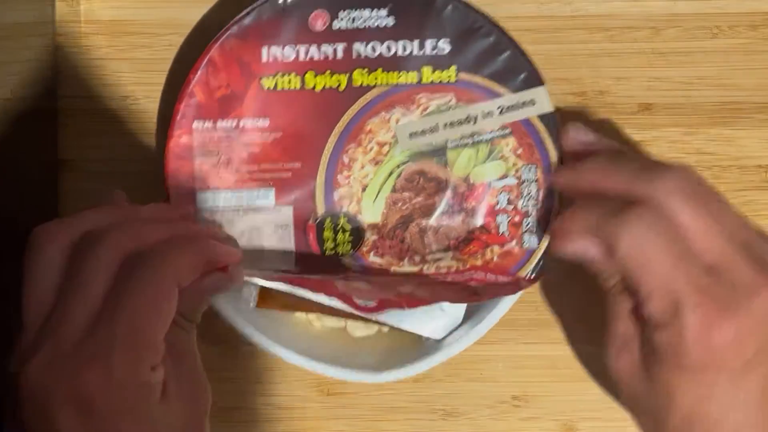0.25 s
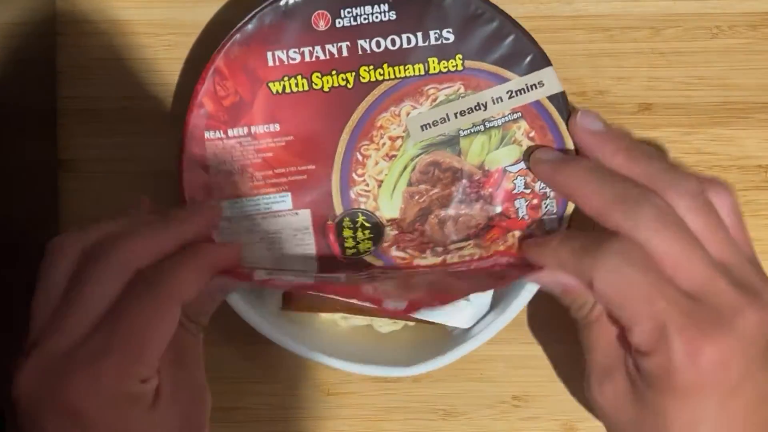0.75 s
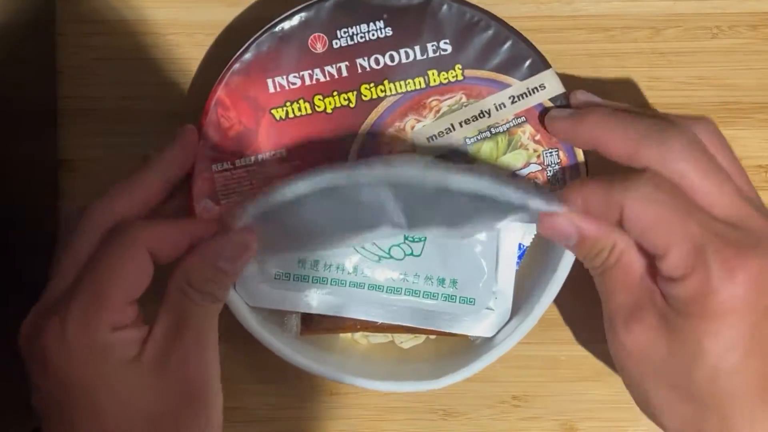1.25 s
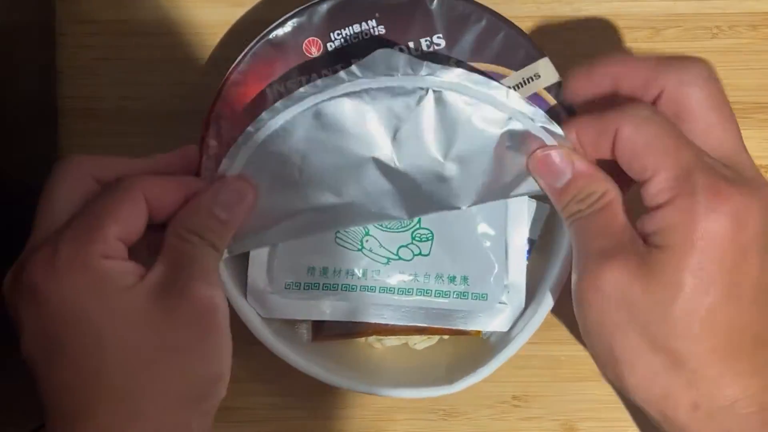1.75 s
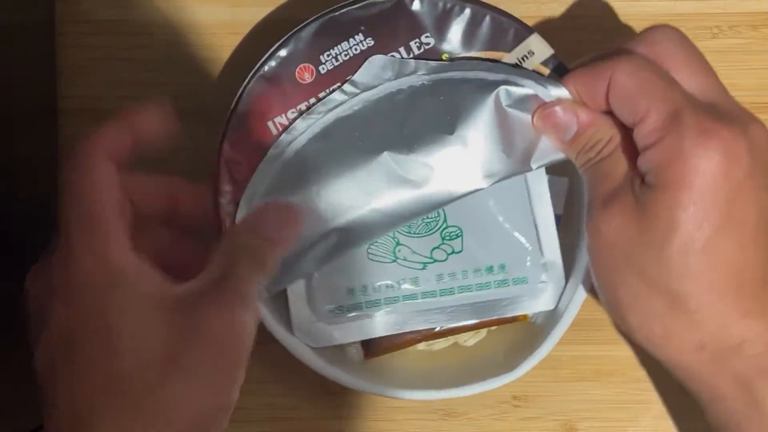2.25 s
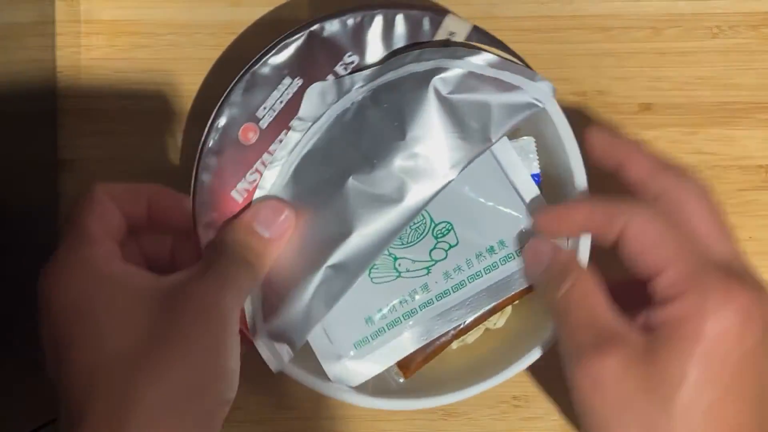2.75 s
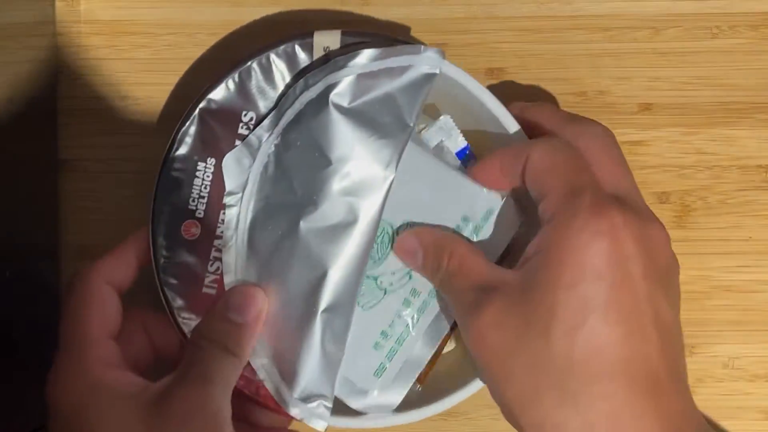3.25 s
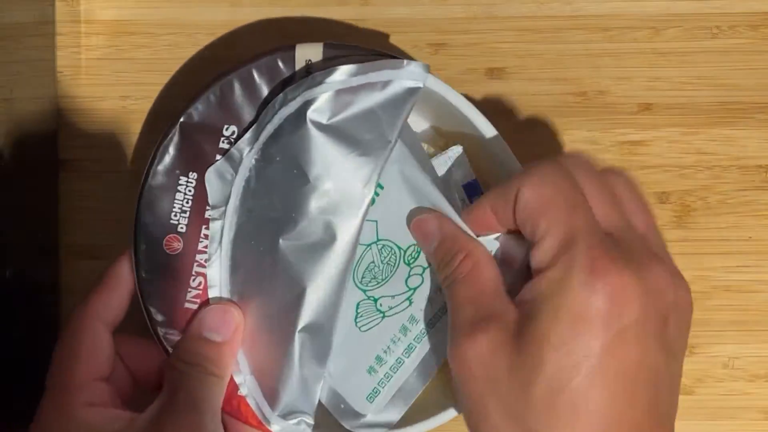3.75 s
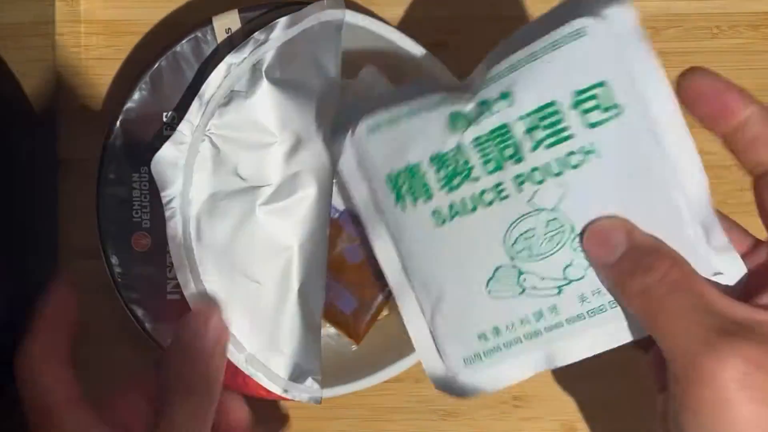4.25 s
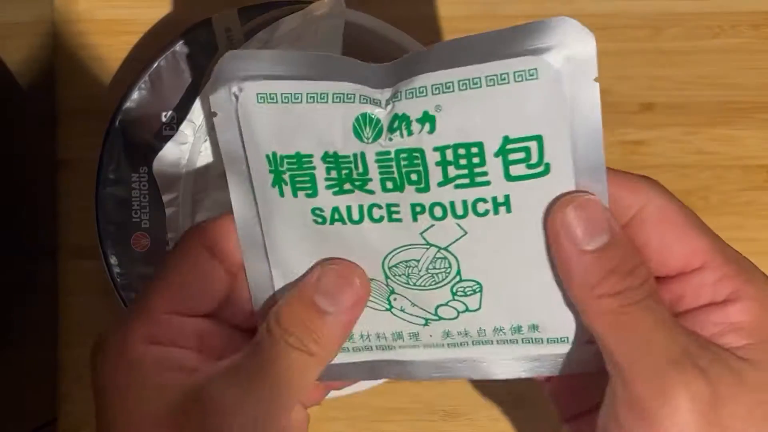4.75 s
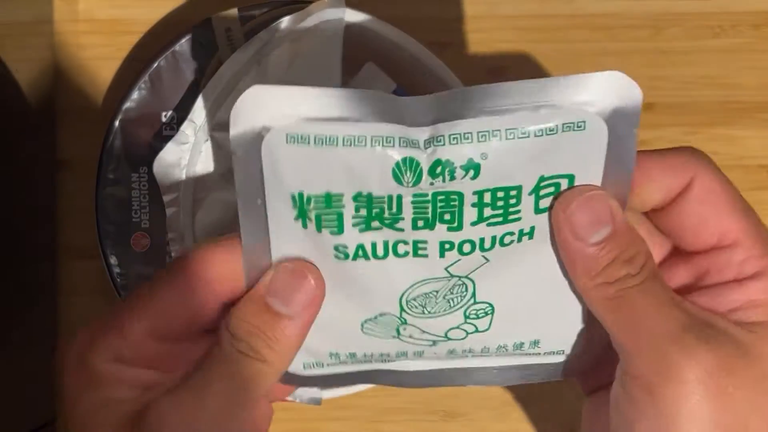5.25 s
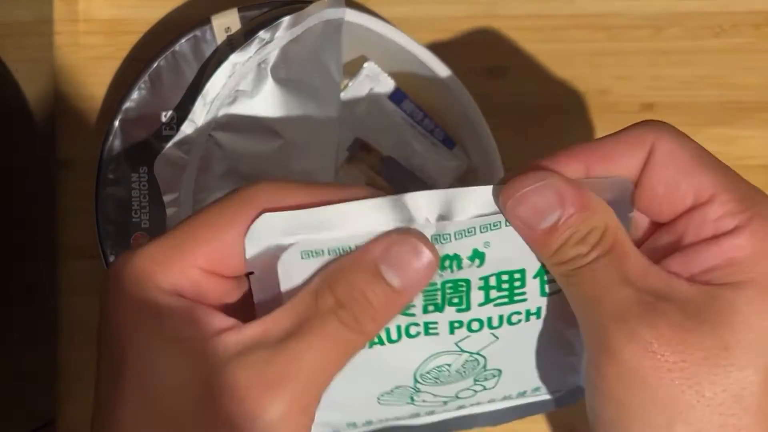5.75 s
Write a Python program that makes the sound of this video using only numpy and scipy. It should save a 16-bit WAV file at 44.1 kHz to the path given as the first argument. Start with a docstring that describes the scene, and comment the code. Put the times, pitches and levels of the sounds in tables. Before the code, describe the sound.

Close, dry foil crinkling with sharp pops and a hollow cup knock, a second crackly flurry, then faint pouch ticks over dull room noise.

```python
"""A quiet room: a foil-lined lid is peeled off a paper cup, then a foil pouch is lifted out and handled, up close.
Foil snaps in short bursts of chatter that crack, ring the sheet and knock the cup, each through its own resonances.
Between them fingers and seal rustle and snapped foil settles: random clicks ring patches, hiss and boom in the cup.
Below lie dull ventilation noise and two wavering hums, made of filtered noise; a short dense echo follows the foil.
Two microphone ports hear it all, shifted in phase and level against each other."""
import sys
import numpy as np
from scipy import signal
from scipy.fft import rfft, irfft, next_fast_len
from scipy.io import wavfile
from scipy.ndimage import uniform_filter1d

SR = 44100
rng = np.random.default_rng(int(sys.argv[2]) if len(sys.argv) > 2 else 0)


def transcribe(signal):
    """Save signal, clipped to [-1, 1], as a 16-bit WAV file at the path in sys.argv[1]."""
    frames = np.atleast_2d(signal).T
    limited = np.clip(frames, -1, 1)
    pcm = np.round(limited * 32767).astype(np.int16)
    wavfile.write(sys.argv[1], SR, pcm)


N = 264159   # samples, about 6 s


def from_db(db):
    """Decibels to gain."""
    return 10 ** (np.asarray(db) / 20)


def rms_one(x):
    """Scaled to rms 1."""
    return x / np.sqrt(np.mean(x ** 2) + 1e-20)


def peak_one(x):
    """Scaled to peak 1."""
    return x / np.max(np.abs(x))


def at_hz(points, hz):
    """Reads a spectrum table on a log frequency axis."""
    table_hz, values = np.transpose(points)
    return np.interp(np.log(hz + 1), np.log(table_hz + 1), values)


def at_s(points, t):
    """Reads a table over time, in straight lines between its points."""
    return np.interp(t, *np.transpose(points))


def colour(x, gain_at):
    """Weights the spectrum of x by a function of frequency."""
    length = x.shape[-1]
    size = next_fast_len(length + SR // 4)
    hz = np.arange(size // 2 + 1) * SR / size
    return irfft(rfft(x, size) * gain_at(hz), size)[..., :length]


def resonance(x, hz, width_hz):
    """Two-pole resonance with gain 1 on top; the narrower, the longer it rings."""
    r = np.exp(-np.pi * width_hz / SR)
    zeros = np.array([1, 0, -1]) * (1 - r * r) / 2
    poles = [1, -2 * r * np.cos(2 * np.pi * hz / SR), r * r]
    return signal.lfilter(zeros, poles, x)


def wander(size):
    """Slow chance, spread 1, changing over about size samples."""
    smooth = uniform_filter1d(rng.standard_normal(N), size=size)
    return rms_one(uniform_filter1d(smooth, size=size))


def clicks(per_s, spread_db, clump_db):
    """Random clicks of uneven size, growing and shrinking in clumps some 10 ms long."""
    size_db = spread_db * np.minimum(rng.exponential(1, N), 4) + clump_db * wander(size=300)
    sizes = from_db(size_db) * rng.choice([-1, 1], N)
    return sizes * (rng.random(N) < per_s / SR) + 1e-18


# colour of the ventilation noise: (frequency [Hz], relative level [dB per Hz])
AIR_COLOUR = [(25, -44), (38, -4.5), (60, 7.5), (120, -7), (330, -9), (480, -14.5), (1800, -27),
              (3000, -39.5), (7000, -75), (16000, -49.5)]
# hums of the room: (frequency [Hz], width [Hz], level [dB])
HUMS = [(45.6, 4.3, -61), (242.9, 4.5, -62)]
AIR_DB = -55


def room_tone():
    """Dull ventilation noise with two hums: noise in narrow resonances wavers like an unsteady tone."""
    air = rms_one(colour(rng.standard_normal(N), lambda hz: from_db(at_hz(AIR_COLOUR, hz))))
    out = from_db(AIR_DB) * air
    for hz, width_hz, db in HUMS:
        out += from_db(db) * rms_one(resonance(rng.standard_normal(N), hz, width_hz))
    return out


ECHO_DB, ECHO_T60_S = -9, 0.089


def echo(x):
    """Dense reflections of table and walls, dying away: sound convolved with a decaying burst of noise."""
    t = np.arange(SR // 3) / SR
    tail = rng.standard_normal(len(t)) * from_db(-60 * t / ECHO_T60_S) * (1 - np.exp(-t / 0.00043))
    tail /= np.sqrt(np.sum(tail ** 2))
    return from_db(ECHO_DB) * signal.fftconvolve(x, tail)[:N]


# swells of rustle: fingers rubbing, and foil settling after a snap; rise and fall span 20 dB:
# (peak time [s], rise [s], fall [s], sheet level [dB], cup level [dB], fizz level [dB])
RUSTLE_SWELLS = [(0.0, .05, 0.21, -58, -48.5, -54.5), (0.128, 0.022, 0.094, -46.5, -41, -48.5),
                 (0.226, 0.078, 0.11, -34, -39, -41.5), (0.416, 0.033, 0.12, -43, -51.5, -51.5),
                 (0.722, 0.088, 0.11, -49, -37.5, -51.5), (0.765, 0.046, 0.13, -47, -53, -51),
                 (0.817, 0.016, 0.06, -36, -36.5, -41.5), (0.841, 0.049, 0.1, -33.5, -36, -38),
                 (0.887, 0.2, 0.051, -32.5, -40, -41.5), (1.016, 0.014, 0.05, -34, -42, -46),
                 (1.257, 0.0068, 0.043, -28, -41, -58.5), (1.341, 0.23, 0.34, -39.5, -46.5, -45),
                 (1.756, 0.033, 0.69, -41, -48, -64), (1.865, 0.074, 0.12, -58, -42, -60),
                 (1.624, 0.014, 0.07, -47.5, -45.5, -47.5), (2.18, 0.092, 0.073, -45.5, -45.5, -52),
                 (2.425, 0.12, 0.16, -42, -45.5, -50), (2.582, 0.041, 0.23, -42.5, -40, -76),
                 (2.7, 0.15, 0.26, -63, -53, -74), (2.825, 0.19, 0.45, -46.5, -53.5, -63.5),
                 (2.95, 0.19, 0.68, -52, -53, -66), (3.172, 0.029, 0.093, -38.5, -45, -55),
                 (3.245, 0.017, 0.1, -34, -43.5, -50.5), (3.364, 0.019, 0.072, -41.5, -41, -59),
                 (3.419, 0.097, 0.1, -34.5, -42, -53.5), (3.552, 0.083, 0.022, -46, -52.5, -75.5),
                 (3.722, 0.036, 0.063, -38.5, -43.5, -56), (3.772, 0.0058, 0.037, -28.5, -32, -54.5),
                 (3.828, 0.067, 0.031, -33.5, -41.5, -40.5), (3.933, 0.098, 0.078, -27.5, -34, -38.5),
                 (4.045, 0.09, 0.077, -35, -48, -66), (4.161, 0.072, 0.19, -41, -49, -53.5),
                 (4.63, 0.16, 0.2, -62, -64.5, -62), (4.87, 0.15, 0.11, -65.5, -63, -76.5),
                 (5.07, 0.039, 0.77, -72.5, -69.5, -65.5), (5.172, 0.13, 0.17, -62, -64.5, -87),
                 (5.396, 0.065, 0.049, -64, -72, -64), (5.544, 0.054, 0.18, -50, -51.5, -61.5),
                 (5.896, 0.086, 0.095, -49, -63, -53)]
# the fingers' grip, a faint rustle under the swells: (time [s], sheet level [dB])
FINGER_GRIP = [(0, -51.5), (1.7, -51.5), (2.1, -77.5), (3.2, -66.5), (3.6, -58.5), (4.3, -68.5), (4.8, -86),
               (5.5, -79.5), (5.8, -60), (6, -99)]
GRIP_CUP_DB, GRIP_FIZZ_DB = -4, -16.5   # against the sheet


def handling():
    """Gains of sheet, cup and fizz: the powers of all swells add up over the grip."""
    t = np.arange(0, N + 64, 64) / SR   # a coarse clock is enough for swells
    peak_s, rise_s, fall_s, *levels = np.transpose(RUSTLE_SWELLS)[:, :, None]
    swell = from_db(-20 * np.maximum((peak_s - t) / rise_s, (t - peak_s) / fall_s))
    grip_db = at_s(FINGER_GRIP, t)
    gains = []
    for swell_db, offset_db in zip(levels, (0, GRIP_CUP_DB, GRIP_FIZZ_DB)):
        swells_power = np.sum((from_db(swell_db) * swell) ** 2, axis=0)
        gain = np.sqrt(swells_power + from_db(grip_db + offset_db) ** 2)
        gains.append(np.interp(np.arange(N) / SR, t, gain))
    return gains


# ringing of the buckled patches: (frequency [Hz], relative level [dB])
PATCH_COLOUR = [(900, -0.5), (1300, 3.5), (2100, 3), (3200, 0), (4500, -10.5), (6000, -12.5)]
# colour of the tiny buckles: (time [s], tilt about 2 kHz [dB per octave])
BUCKLE_TILT = [(0, 0), (0.75, 1.5), (0.9, -1), (1.7, 0.5), (2.6, 0.5), (2.85, 1), (3.1, 1), (3.4, -1),
               (3.76, -1.5), (3.82, 3.5), (3.88, -0.5), (6, -3.5)]
CRACKLE_DB = -8   # larger buckles that ring the whole sheet, against the tiny ones


def sheet_rustle(buckles):
    """Tiny buckles each ring a patch of foil, the smaller the higher; larger ones ring every patch."""
    patch = rng.integers(0, 16, N)
    busy = [wander(size=900) for _ in range(4)]   # small and large patches take turns
    crackle = from_db(CRACKLE_DB) * rms_one(clicks(600, spread_db=3.5, clump_db=1.0))
    tilt_db = at_s(BUCKLE_TILT, np.arange(N) / SR)
    out = np.zeros(N)
    for k, hz in enumerate(np.geomspace(900, 6000, num=16)):
        own = rms_one(buckles * (patch == k) * from_db(2.0 * busy[k // 4]))
        ring = rms_one(resonance(own + crackle, hz, 0.082 * hz))
        gain = from_db(at_hz(PATCH_COLOUR, hz) + tilt_db * np.log2(hz / 2000)) * np.sqrt(hz)
        out += gain * ring * (-1) ** k   # neighbours in opposite sign
    return rms_one(out)


# colour of the fizz: (frequency [Hz], relative level [dB per Hz])
FIZZ_COLOUR = [(2600, 7), (4000, 8.5), (5500, 8), (7500, 6.5), (10000, 5), (13000, 3.5), (16000, 2.5)]


def fizz_rustle(buckles):
    """The finest buckles come so densely that they merge into a hiss above 2.5 kHz."""
    dense = 0.21 * buckles + clicks(20000, spread_db=3.5, clump_db=2.5)
    fizz = colour(dense, lambda hz: from_db(at_hz(FIZZ_COLOUR, hz)) * (hz > 2500))
    treble = signal.butter(4, 6000, "high", fs=SR, output="sos")
    return fizz / np.std(signal.sosfilt(treble, fizz))   # the level counts above 6 kHz


# boom of the cup: (frequency [Hz], width [Hz], relative level [dB])
CUP_MODES = [(152, 66, -6), (302, 54, -2.5), (440.4, 100, -0.5), (630, 140, 2), (793, 124, 0.5)]


def cup_boom():
    """The coarsest buckles shake the cup, which booms in its low modes."""
    shakes = clicks(2500, spread_db=2.5, clump_db=1.0)
    out = np.zeros(N)
    for k, (hz, width_hz, db) in enumerate(CUP_MODES):
        out += from_db(db) * rms_one(resonance(shakes, hz, width_hz)) * (-1) ** k
    return rms_one(out)


def rustle():
    """Rustle of fingers, seal and settling foil: sheet, fizz and cup each follow the swells."""
    sheet_gain, cup_gain, fizz_gain = handling()
    buckles = clicks(6000, spread_db=-2.5, clump_db=2.0)
    return sheet_gain * sheet_rustle(buckles) + fizz_gain * fizz_rustle(buckles) + cup_gain * cup_boom()


# bursts of snapping foil; a snap with two rings or a longer knock takes two rows:
# (time [s], cup frequency [Hz], cup peak level [dB], sheet frequency [Hz], sheet peak level [dB],
# crack peak level [dB])
SNAP_BURSTS = [(0.04, 375, -40.5, 1110, -37.5, -55), (0.203, 544, -24.5, 1070, -19, -25),
               (0.231, 584, -24, 2140, -42, -48), (0.277, 920, -34, 2050, -22, -28),
               (0.388, 560, -38, 1360, -28, -56), (0.428, 597, -36.5, 2400, -43.5, -37),
               (0.58, 850, -39, 1210, -28.5, -54), (0.626, 630, -35.5, 1100, -35, -39),
               (0.755, 573, -28, 1550, -27.5, -46), (0.769, 600, -45, 2830, -31, -38),
               (0.8175, 800, -29, 2200, -24, -45), (0.8361, 448, -24.5, 2410, -36, -46),
               (1.004, 263, -33, 1380, -18, -25), (1.128, 520, -35.5, 1040, -44, -42),
               (1.202, 760, -34.5, 1280, -31.5, -42), (1.253, 660, -44, 3430, -15, -23),
               (1.2538, 900, -41, 1350, -18.5, -43), (1.2962, 695, -25.5, 1896, -14, -60),
               (1.308, 624, -24.5, 2220, -39, -49), (1.328, 483, -29, 2680, -12, -9),
               (1.3335, 705, -27, 1700, -14.5, -39), (1.383, 480, -31, 1200, -38, -55),
               (1.394, 510, -25.5, 2320, -18.5, -49), (1.476, 660, -30.5, 1510, -29.5, -39),
               (1.568, 483, -34, 1340, -30.5, -37), (1.605, 570, -34, 3120, -41, -41),
               (1.676, 576, -34, 2420, -45, -43), (1.845, 302, -22.5, 2020, -22, -33),
               (1.868, 310, -33, 2200, -38, -55), (1.913, 484, -22, 1930, -31, -63),
               (2.147, 500, -34, 2290, -21.5, -57), (2.417, 508, -19, 2190, -22.5, -54),
               (2.463, 524, -27.5, 1470, -23, -58), (2.489, 365, -39, 2050, -29, -59),
               (2.566, 628, -6.5, 1980, -8.5, -14), (2.998, 700, -35.5, 2720, -39, -39),
               (3.165, 613, -43, 3420, -35, -30), (3.236, 760, -27.5, 1250, -28, -30),
               (3.243, 733, -21, 1350, -15.5, -19), (3.406, 430, -29.5, 1480, -20.5, -24),
               (3.766, 570, -24.5, 2320, -15, -20.5), (3.8723, 630, -30, 1090, -19.5, -25),
               (3.886, 667, -28, 2490, -28, -30), (3.8977, 615, -21.5, 2660, -15.5, -29),
               (3.925, 620, -26, 2280, -21, -18), (3.933, 557, -29, 1070, -19.5, -24),
               (3.9497, 504, -42, 1590, -20, -30), (4.031, 603, -48, 2220, -26.5, -41),
               (4.1462, 1050, -19.5, 2120, -13.5, -28), (4.205, 514, -51, 1430, -25.5, -50),
               (4.314, 280, -57.5, 1435, -34, -44), (4.488, 810, -46, 1210, -34.5, -73),
               (4.622, 250, -55, 1210, -40, -58), (4.652, 496, -48, 1490, -41, -64),
               (4.661, 600, -65, 2300, -33, -50), (4.663, 827, -38, 1190, -31.5, -39),
               (4.741, 258, -51, 1160, -43, -76), (4.852, 401, -55, 1660, -50, -70),
               (4.909, 269, -48.5, 1264, -46.5, -68.5), (4.962, 249, -55, 1280, -47.5, -73.5),
               (5.118, 552, -54.5, 1240, -38.5, -73.5), (5.16, 650, -54, 1230, -33, -73),
               (5.247, 318, -57.5, 4230, -63, -46), (5.257, 403, -58, 1180, -41, -63),
               (5.403, 397, -63, 2900, -52, -56), (5.4748, 283, -46.5, 1250, -41, -70),
               (5.496, 403, -63, 2900, -57, -56), (5.533, 860, -52, 1440, -36, -39.5),
               (5.544, 600, -56, 2360, -31, -56), (5.554, 820, -30.5, 1310, -18.5, -41),
               (5.611, 820, -37.5, 1330, -32.5, -65), (5.716, 354, -66, 1010, -46, -47.5),
               (5.747, 265, -73, 1250, -35, -61), (5.865, 248, -58, 1470, -36.5, -34.5),
               (5.886, 693, -41, 2660, -28, -42), (5.898, 466, -32.5, 950, -36, -56),
               (5.945, 524, -41.5, 980, -42.5, -65), (5.966, 500, -60, 1600, -39.5, -66)]
FOLD_S = 0.0027   # dying time of a fold
TICK_LAG_S, CUP_LAG_S = 0.000885, 0.0016   # the sharpest buckle and the knock on the cup follow the first crack
# ring width over pitch: the pouch in the hands is damped
LID_WIDTH, POUCH_WIDTH, POUCH_FREE_S = 0.16, 0.25, 4.3


def snaps():
    """Foil snaps in short bursts that crack, ring the sheet and thump the cup; some snaps take two bursts."""
    out, t = np.zeros(N + SR), np.arange(SR // 10) / SR
    crack_band = signal.butter(2, [3000, 6500], "band", fs=SR, output="sos")
    air_band = signal.butter(1, [6500, 11000], "band", fs=SR, output="sos")
    # the fold runs out at once, then the sheet around it settles more slowly
    fold = (1 - np.exp(-t / 0.0004)) * (np.exp(-t / FOLD_S) + from_db(-17.5) * np.exp(-t / 0.014))
    # one sharp buckle and one short knock stand out of the chatter
    soon, late = np.maximum(t - TICK_LAG_S, 0), np.maximum(t - CUP_LAG_S, 0)
    buckle = peak_one(soon * np.exp(-soon / 0.0001))
    knock = peak_one(late * np.exp(-late / 0.00028))
    # random signs under the fold's envelope: separate chatter for crack, sheet and cup
    chatter = rng.choice([-1., 1.], (len(SNAP_BURSTS), 3, len(t))) * fold
    for row, (crack_chatter, sheet_chatter, cup_chatter) in zip(SNAP_BURSTS, chatter):
        s, cup_hz, cup_db, sheet_hz, sheet_db, crack_db = row
        width = POUCH_WIDTH if s > POUCH_FREE_S else LID_WIDTH

        crack = signal.sosfilt(crack_band, crack_chatter)
        crack += from_db(-8.0) * signal.sosfilt(air_band, crack_chatter)

        tick = buckle + 0.46 * sheet_chatter
        sheet = resonance(tick, sheet_hz, width * sheet_hz) + from_db(-17) * resonance(tick, 1900, 2200)
        sheet = resonance(sheet, sheet_hz, 1.5 * sheet_hz)

        push = knock + 0.35 * cup_chatter
        cup = resonance(push, cup_hz, 1.15 * width * cup_hz)
        # a lower wall mode rings along
        cup += 0.47 * resonance(push, 0.69 * cup_hz, 0.91 * width * cup_hz)
        cup = resonance(cup, cup_hz, 0.68 * cup_hz)

        burst = from_db(crack_db) * peak_one(crack)
        burst += from_db(sheet_db) * peak_one(sheet)
        burst += from_db(cup_db) * peak_one(cup)
        at = round(s * SR)
        out[at:at + len(t)] += burst
    return out[:N]


def scene():
    """The same events in two draws of their fine detail: what the ports share and what is opposed between them."""
    foils = [snaps() + rustle() for _ in range(2)]
    return np.array([foil + echo(foil) + room_tone() for foil in foils])


# phase between the two ports: (frequency [Hz], lead of the left [rad])
PORT_LEAD = [(0, 0), (1200, .1), (1750, 1.2), (2300, 0), (2900, -.45), (5100, -.2), (5450, 1.9),
             (6300, 2.1), (7200, np.pi), (8800, 2 * np.pi), (10000, 6.4), (12000, 9.25), (13300, 9.6),
             (15100, 4 * np.pi)]
# level between the ports: (frequency [Hz], left minus right [dB])
PORT_TILT = [(300, 0), (500, -1.5), (900, -.5), (1400, -3), (2000, 5), (2700, 2.5), (3200, 0), (16000, 0)]
# what the ports do not share: (frequency [Hz], opposed share of the power [0 to 1])
PORT_APART = [(50, .003), (300, .04), (1000, .15), (1700, .4), (2600, .05), (5000, .04), (6200, .1),
              (7200, .003), (8000, .1), (9500, .005), (11000, .12), (12000, .004), (13300, .004),
              (14200, .12), (15500, .005)]
CUTOFF_HZ = 15700


def record(dry):
    """The ports hear the sound shifted in phase and level against each other; the top is cut."""
    side = np.array([[.5], [-.5]])   # left, right
    shared = colour(dry[0], lambda hz: np.sqrt(1 - at_hz(PORT_APART, hz)))
    # a quarter cycle off, so it favours no side
    opposed = colour(dry[1], lambda hz: 1j * np.sqrt(at_hz(PORT_APART, hz)))

    def port_gain(hz):
        """Half of the level and phase difference goes to each port."""
        return from_db(side * at_hz(PORT_TILT, hz)) * np.exp(1j * side * at_hz(PORT_LEAD, hz))

    ports = colour(shared + 2 * side * opposed, port_gain)
    return signal.sosfilt(signal.ellip(8, .5, 50, CUTOFF_HZ, fs=SR, output="sos"), ports)


dry = scene()
out = record(dry)
transcribe(out)
```